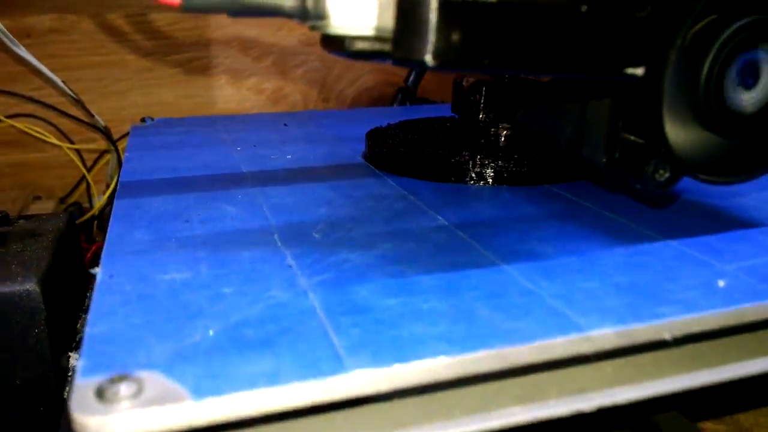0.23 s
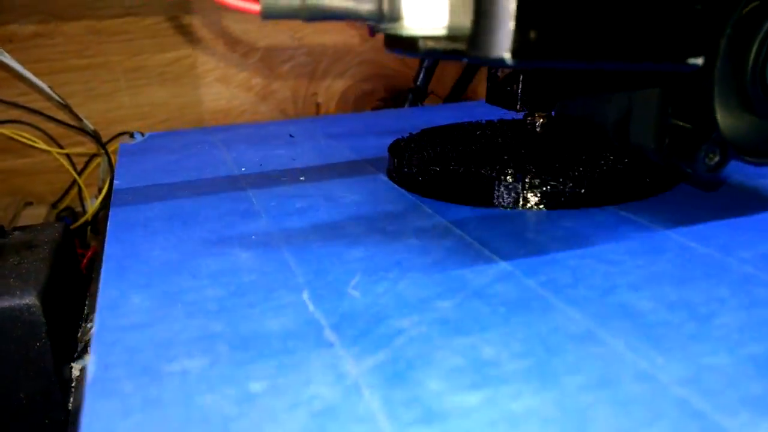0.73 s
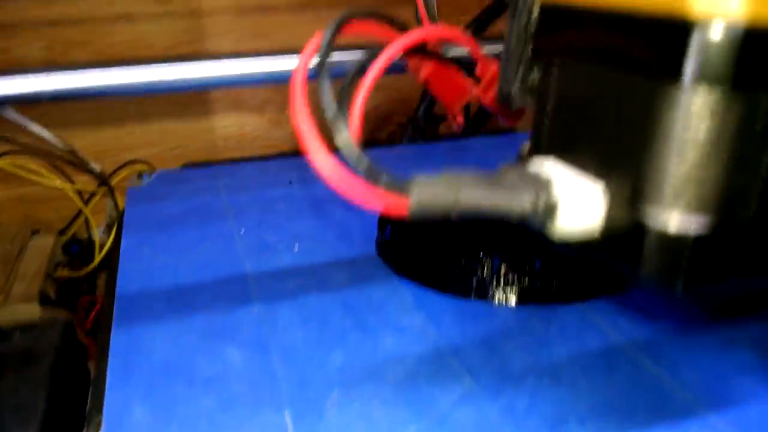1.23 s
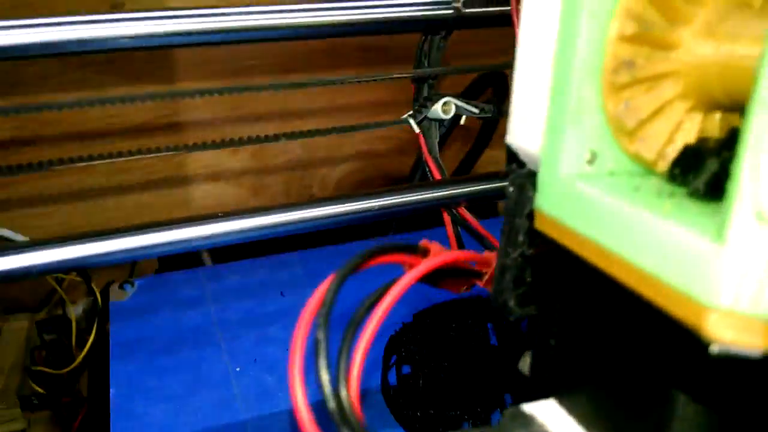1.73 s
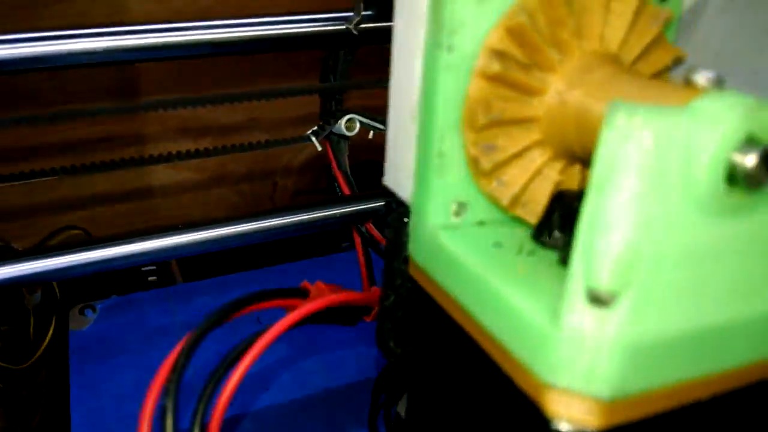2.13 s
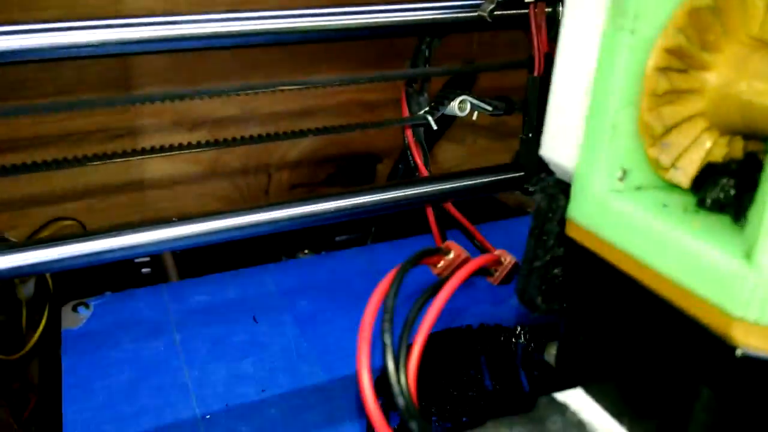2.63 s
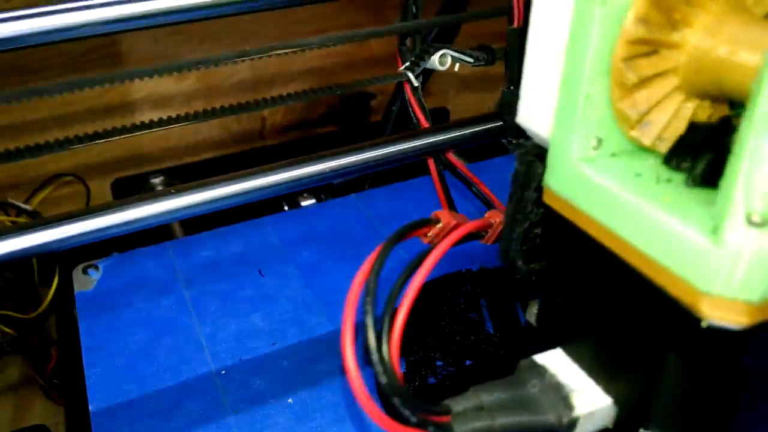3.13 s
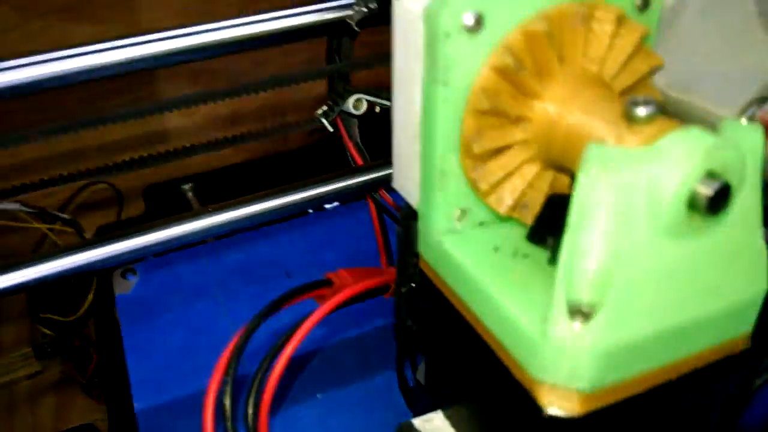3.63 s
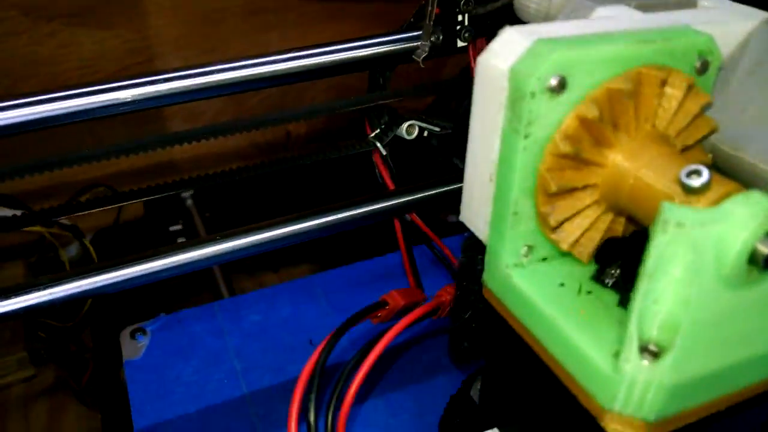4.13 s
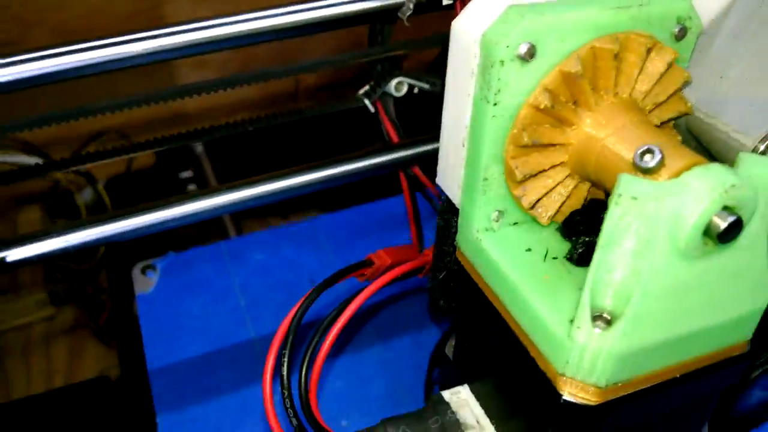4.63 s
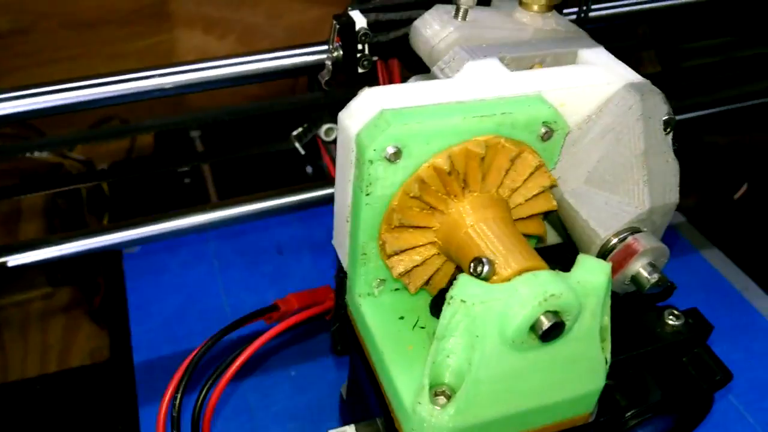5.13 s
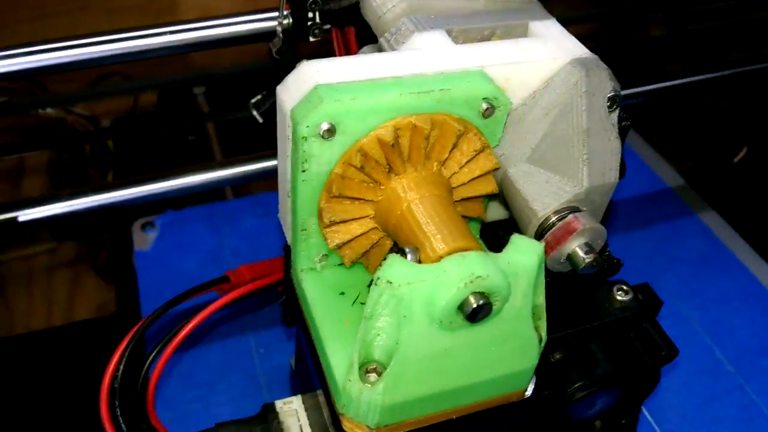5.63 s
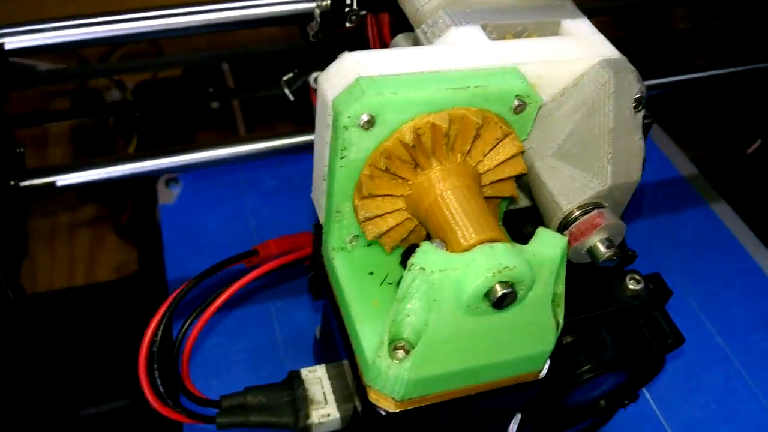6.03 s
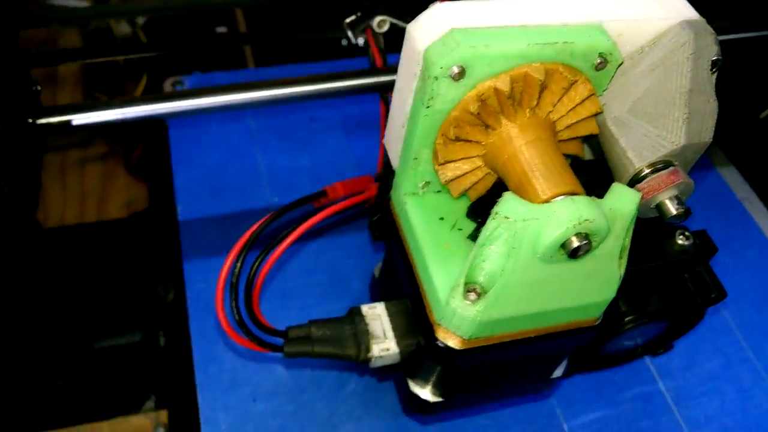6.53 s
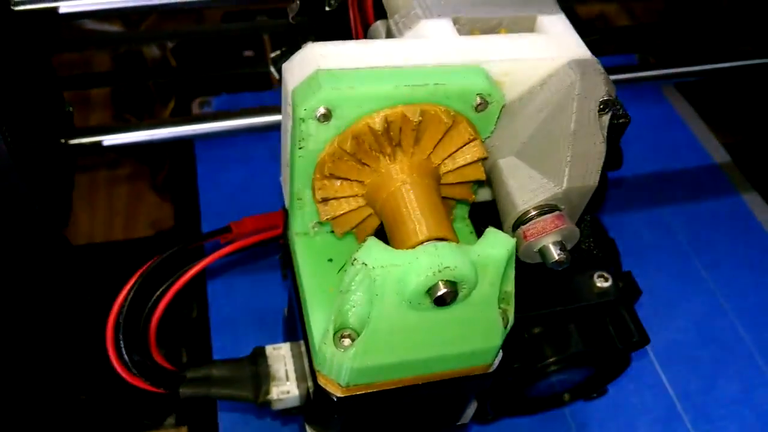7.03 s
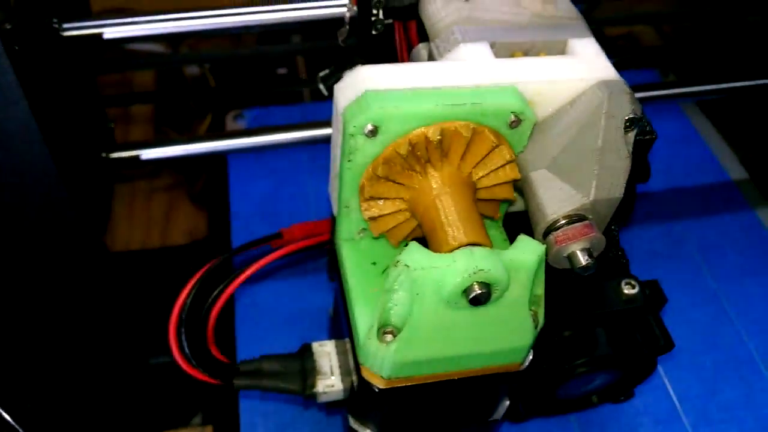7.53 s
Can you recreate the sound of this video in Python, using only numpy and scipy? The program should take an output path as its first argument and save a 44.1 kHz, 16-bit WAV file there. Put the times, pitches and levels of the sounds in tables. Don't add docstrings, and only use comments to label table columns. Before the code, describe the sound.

A desktop 3D printer's stepper motors whine in quick rising, held and sinking tones over fan hiss, with soft corner knocks and one hard microphone tap.

```python
import sys
import numpy as np
from scipy import signal
from scipy.fft import rfft, irfft
from scipy.io import wavfile
from scipy.ndimage import uniform_filter1d

SR = 44100
rng = np.random.default_rng(int(sys.argv[2]) if len(sys.argv) > 2 else 0)


def output_pcm(signal):
    pcm = np.clip(np.atleast_2d(signal).T, -1, 1) * 32767
    wavfile.write(sys.argv[1], SR, np.round(pcm).astype(np.int16))


def linear_from_db(decibels):
    return 10 ** (np.asarray(decibels, float) / 20)


N = 343098
TIME = np.arange(N) / SR
FREQ = np.arange(N // 2 + 1) * SR / N + 1e-3

# cruise microstep rates of (bed f/Hz, carriage f/Hz) at the one feed rate
FLAT, SLANT, STEEP = (5163.5, 2138.5), (4435.5, 3400.5), (729.6, 5544.)
ALONG, ACROSS, TALL = (5544., 729.6), (3400.5, 4435.5), (2138.5, 5163.5)
MICROSTEPS = 16
LAP_S = 4.337
# (t/s, heading, strength level/dB)
LAP = [(-.58, FLAT, 0), (-.077, TALL, 3.5), (-.002, FLAT, -0.5), (.049, TALL, 1.5), (.199, FLAT, -1.5),
       (0.283, TALL, -1), (.354, FLAT, -1), (.856, SLANT, 0.5), (1.373, ALONG, 1.5), (1.439, STEEP, -1),
       (1.499, ACROSS, 5.5), (1.646, STEEP, 1.5), (1.699, ALONG, -0.5), (1.765, SLANT, 0.5),
       (2.266, ALONG, -3), (2.299, STEEP, -1.5), (2.791, SLANT, -1.5), (2.891, ACROSS, -33),
       (2.946, ALONG, -1.5), (3.091, ACROSS, -7), (3.139, SLANT, 1.5), (3.239, STEEP, -0.5),
       (3.73, ACROSS, -9)]
# (f/Hz, level/dB per Hz)
FANS = [(30, -11), (60, -3), (120, 3), (250, -3.5), (500, -11.5), (900, -11.5), (1500, -12.5),
        (2500, -13.5), (4000, -18), (7500, -19.5), (11000, -17.5), (14000, -14), (15500, -18.5)]
# (f/Hz, width/Hz, level/dB)
CASE = [(120.1, 10, 3.5), (256.5, 36, 4), (483, 34, 14.5), (2050, 97, 6.5), (3230, 760, 3.5), (631, 18, 2),
        (1058, 25, 4.5), (6800, 980, 3.5)]
TAP_S = 6.2297


def steppers():
    # (multiple of the full-step rate, level/dB)
    bed_hum = [(1, 0), (2, -7), (3, -11.5), (4, -12), (5, -8), (6, -12), (7, -16), (8, -42), (10, -16.5),
               (14, -18), (15, -8), (17, -16.5)]
    bed_step = [(16, 0)]
    bed_over = [(31, -11), (32, 1.5), (33, -36), (48, -9.5), (48.5, -19), (64, -10), (96, -15.5),
                (144, -46), (160, -4.5)]
    carriage_step = [(1, -9), (3, -8.5), (4, -6.5), (6, -15), (15, -18), (16, 1), (17, -10)]
    carriage_over = [(31, -18), (32, 0), (33, -29)]
    tick_orders = [(2, -2), (2, -1), (2, 1), (2, 2), (4, -1), (2, -6), (2, -1 / 16)]
    tick_levels = [-7, -9, -20, -31, -29, -20, -12]
    # (f/Hz, width/Hz, level/dB)
    frame_modes = [(252.7, 86, 16), (503, 26, 16), (711, 8, 4), (1037, 370, 8), (2022, 74, 16),
                   (2540, 490, 10), (4452, 112, 14.5), (5260, 1250, 7), (6470, 160, 7.5), (8880, 190, 18),
                   (10200, 430, 5.5), (13930, 1700, 26)]
    voices = {FLAT: (-32, -36.5, -35.5, -37.5, -44.5), SLANT: (-29.5, -28, -34, -43.5, -50),
              STEEP: (-25, -33.5, -40, -38.5, -40), ALONG: (-34.5, -37.5, -36, -37.5, -52),
              ACROSS: (-29.5, -41, -53, -45, -29), TALL: (-30, -35, -35.5, -37, -33)}
    # (t/s, nearness, facing the bed step, the overtones, the carriage)
    drift = [(0, 0.5, -4.5, -7.5, -1.5), (.6, 0, 5, 2.5, 5.5), (.9, 3, -6, -15, -4.5),
             (1.1, 0, -2.5, 4, -8), (1.35, 1.5, -12, -10, -2.5), (1.85, 0, -13.5, -5.5, -0.5),
             (2.05, 1, -7.5, -12, -2.5), (2.25, -0.5, 3.5, 2.5, -1), (2.8, -1, 6, 1.5, 0.5),
             (3.5, -1.5, 3.5, 2, -3), (4, 1.5, -10, -1, -4), (4.8, 0.5, -1.5, -4.5, -3),
             (5.15, 2, -11, -6, -2), (5.4, -1.5, -7.5, 0.5, 0.5), (5.7, -2, -1.5, -3, 3.5),
             (6.35, 0, -5, -7, -2), (6.55, 1, 1, -2.5, -5.5), (7.78, 1, -1.5, -4, -2)]

    bed, carriage = np.transpose([heading for _, heading, _ in LAP])
    move, speed = motion()
    ramping = uniform_filter1d(1. * (speed < 1), size=300)
    step_blur, over_blur, carriage_blur = [linear_from_db(db * ramping) for db in (0, -9, -4)]
    speed = speed * (1 + .03 * (speed < 1) * walk(300))
    bed_hz, carriage_hz = speed * bed[move], speed * carriage[move]

    frame = peaks(frame_modes) ** 1.36 / (1 - 1j * 170 / FREQ) ** 2
    t, near, to_step, to_over, to_carriage = np.transpose(drift)
    aims = near, near + to_step, near + to_over, near + to_carriage, near + to_over
    heard = np.transpose([np.add(voices[heading], db) for _, heading, db in LAP])
    cruise = np.maximum(bed / MICROSTEPS, 250), bed, 2 * bed, carriage, 2 * carriage
    drives = []
    for aim, db, hz in zip(aims, heard, cruise):
        push = linear_from_db(db) / np.interp(hz, FREQ, abs(frame))
        drives.append(linear_from_db(np.interp(TIME, t, aim)) * uniform_filter1d(push[move], size=400))
    hum, step, over, slide, slide_over = drives

    bed_full, carriage_full = bed_hz / MICROSTEPS, carriage_hz / MICROSTEPS
    sound = hum * tones(bed_hum, bed_full)
    sound = sound + step_blur * step * tones(bed_step, bed_full)
    sound = sound + over_blur * over * tones(bed_over, bed_full)
    fast, slow = np.maximum(bed_hz, carriage_hz), np.minimum(bed_hz, carriage_hz)
    ticks = 0
    for (m, n), db in zip(tick_orders, tick_levels):
        ticks = ticks + tones([(1, db)], np.abs(m * fast + n * slow))
    sound = sound + carriage_blur * slide * (tones(carriage_step, carriage_full) + ticks)
    sound = sound + over_blur * slide_over * tones(carriage_over, carriage_full)
    return shape(sound, frame) * linear_from_db(0.64)


def motion():
    corner, ramp_per_s = .215, 15.2
    start = np.array([s + lap * LAP_S for lap in range(3) for s, _, _ in LAP])
    move = np.searchsorted(start, TIME, side="right") - 1
    from_corner = np.minimum(TIME - start[move], start[move + 1] - TIME)
    return move % len(LAP), np.minimum(1, corner + ramp_per_s * from_corner)


def tones(table, steps_hz):
    phase = 2 * np.pi * np.cumsum(steps_hz) / SR
    out = 0
    for k, db in table:
        level = np.sqrt(2) * linear_from_db(db + 1.2 * walk(9))
        out = out + level * np.sin(k * phase + k * k) * (k * steps_hz < SR / 2.5)
    return out


def jolts():
    # (t/s, peak level/dB, low mode level/dB)
    shoves = [(-.588, -46, -14), (-.081, -37, 5), (-.019, -30, 12), (.046, -18, -3), (.199, -16, -0.5),
              (.276, -14, -15), (.358, -17.5, 3), (.83, -22, -15), (.858, -25, 15), (1.349, -20, 6),
              (1.385, -34, 16), (1.44, -22, 6.5), (1.496, -19, 1.5), (1.647, -27.5, 6), (1.71, -36, -16),
              (1.76, -16, -0.5), (2.279, -31, 9), (2.329, -22, 9), (2.759, -15.5, -11), (2.812, -17, -1),
              (2.905, -24.5, -14), (2.95, -26, 6.5), (3.095, -16, 2), (3.138, -18, 4.5), (3.235, -26, 14),
              (3.278, -24, -9), (3.708, -23, 5.5)]
    # (f/Hz, t60/s)
    shove_modes = [(262, 0.11), (488, 0.1), (748, 0.096)]
    out, age = np.zeros(N + SR), np.arange(SR // 6) / SR
    rows = [(s + lap * LAP_S, db, low) for lap in range(2) for s, db, low in shoves]
    rows = [row for row in rows if 0 < row[0] < N / SR]
    for (s, db, low), chance in zip(rows, rng.random((len(rows), 3))):
        high = -14 + (0.5 - -14) / (1 + np.exp((s - 2.05) / .15))
        for (hz, t60), rel, u in zip(shove_modes, (low, 0, high), chance):
            swell = 1 - np.exp(-age / 0.0046)
            ring = linear_from_db(db + rel - 6.0 - 60 * age / t60) * swell * 2
            pitch = hz * (.97 + 0.024 * u)
            out[int(s * SR):][:len(age)] += ring * np.sin(2 * np.pi * (pitch * age + u))
    return out[:N]


def tap():
    # (f/Hz, level/dB, t60/s)
    shell = [(540, 1, .011), (720, -14, .05), (2600, -1, .0045), (8500, -4, .0025), (5500, -9, .002),
             (11500, -6, .002), (280, -13, .06)]
    out = np.zeros(N)
    for late, weak in ((0, 1), (.0046, -.2)):
        age = np.maximum(TIME - TAP_S - late, 0)
        for hz, db, t60 in shell:
            out = out + weak * linear_from_db(-3 + db - 60 * age / t60) * np.sin(2 * np.pi * hz * age)
    age = np.maximum(TIME - TAP_S - .001, 0)
    ring = linear_from_db(-12 - 60 * age / .11) * np.sin(2 * np.pi * 560 * age)
    dull = shape(np.roll(out, shift=14), 1 / (1 + 1j * FREQ / 4000))
    return np.array([out, ring - linear_from_db(-4) * dull])


def handling():
    # (t/s, length/s, level/dB, f/Hz)
    brushes = [
        (0.694, 0.049, -24.5, 1190),
        (.76, 0.028, -29.5, 1500),
        (4.996, 0.012, -29.5, 2217),
        (5.017, .04, -31, 1800),
    ]
    out = np.zeros(N)
    for s, length, db, hz in brushes:
        age = np.maximum(TIME - s, 0) / length
        envelope = (TIME > s) * np.exp(-age ** 3) * np.minimum(age * 8, 1)
        grains = rng.standard_normal(N) * linear_from_db(4.2 * walk(300)) * envelope
        band = 1 / (1 + 1j * (FREQ - hz * hz / FREQ) / (1.3 * hz))
        out = out + linear_from_db(db + 9) * shape(grains, band)
    return out


def gear():
    # (f/Hz, width/Hz, level/dB)
    housing = [(1045, 36, 34), (1142, 40, 34), (1417, 60, 30.5)]
    clicks = (rng.random(N) < 70 / SR) * linear_from_db(5.8 * rng.standard_normal(N))
    ring = shape(clicks, peaks(housing) - 1)
    faced_s, turned_s, aside_db = 3.9, 5.15, -11
    faced = np.clip(np.minimum(TIME - faced_s, turned_s - TIME) / 0.11, 0, 1)
    return ring / ring.std() * linear_from_db(-38.5 + aside_db * (1 - faced))


def rattle():
    # (t/s, length/s, middle level/dB, high level/dB)
    scrapes = [(0, .03, -17, 8), (0.317, 0.059, 8, -7), (.745, 0.035, 14, 2), (1.561, 0.11, 7, 2),
               (1.71, .06, 6.5, 0.5), (1.82, 0.017, -1, 12), (2.25, .04, 2, 1), (3.021, 0.025, 9, 11),
               (3.765, 0.044, 5.5, 5), (4.159, 0.081, 0, 4), (4.59, 0.073, 3, -1.5), (4.797, 0.1, 3, 3),
               (5.023, 0.064, 11, 0), (5.945, 0.028, 8, 8), (6.29, 0.044, 6, 8), (7.175, .04, -10, 6.5)]
    shake_db, wander_db = (0.5, 5, 1.5), (2, 1.9, 1.2)
    ramping = uniform_filter1d(1 - motion()[1], size=800)
    ramping = 2 * (ramping - ramping.mean())
    low, mid, high = [db * ramping + spread * walk(12) for db, spread in zip(shake_db, wander_db)]
    for s, length, mid_db, high_db in scrapes:
        bump = np.exp(-((TIME - s) / length) ** 2)
        mid, high = mid + mid_db * bump, high + high_db * bump
    return low, mid, high


def hiss():
    low, mid, high = rattle()
    noise = rfft(rng.standard_normal(N)) * linear_from_db(read(FANS)) * peaks(CASE)
    out, shiver = 0, walk(22)
    for hz in 30 * 2 ** np.arange(0, 9.4, .5):
        place = np.log2(hz / 1000)
        swell = low * np.clip(-place / 2, 0, 1)
        swell = swell + mid * np.clip(1 - abs(place) / 2.4, 0, 1)
        swell = 0.65 * (swell + high * np.clip(place / 3.0, 0, 1))
        band = np.cos(np.pi * np.clip(np.log2(FREQ / hz), -.5, .5)) ** 2
        flicker = 1.3 * walk(28) + .3 * max(place, 0) * shiver
        out = out + linear_from_db(swell + flicker) * irfft(noise * band, N)
    return out * linear_from_db(-26) / np.sqrt(np.mean(out ** 2))


def fan_tones():
    blade = tones([(1, -46.5)], 665 * (1 + .002 * walk(4)))
    whistle = tones([(1, -44)], 6706 * (1 + .0005 * walk(12)))
    return blade + whistle * np.clip((TIME - 6.58) / .1, 0, 1)


def port_noise():
    # (f/Hz, level/dB)
    apart = [(40, -9), (150, -6.5), (500, 2), (1200, -11.5), (3000, -21), (8000, -13.5), (15000, -17)]
    return shape(rng.standard_normal((2, N)), linear_from_db(read(FANS) + read(apart)) * peaks(CASE)) * linear_from_db(-11.5)


def left_port(right):
    # (f/Hz, phase/rad)
    bass_turn = [(40, 0.15), (60, 0.53), (100, 2.1), (200, 1.77), (300, 1.5), (500, 0.99), (850, 0.38),
                 (1300, 0.17), (2400, 0.18), (15000, 0.033)]
    # (f/Hz, level/dB)
    balance = [(40, -9), (80, -15), (200, -5.5), (500, 0.6), (1300, -0.26), (4000, -2.5), (9000, -3.5),
               (15000, -1.5)]
    lag_s = 17.2 / 44100
    return shape(right, -linear_from_db(read(balance)) * np.exp(-1j * (2 * np.pi * FREQ * lag_s + read(bass_turn))))


def read(table):
    hz, value = np.transpose(table)
    return np.interp(np.log(FREQ), np.log(hz), value)


def shape(x, response):
    return irfft(rfft(x) * response, N)


def peaks(modes):
    return 1 + sum((linear_from_db(db) - 1) / (1 + 1j * (FREQ - hz * hz / FREQ) / width) for hz, width, db in modes)


def walk(rate):
    k = int(SR / rate)
    held = np.repeat(rng.standard_normal(N // k + 1), k)
    return 1.3 * uniform_filter1d(uniform_filter1d(held, k), k)[:N]


def scene():
    right = steppers() + jolts() + handling() + gear() + hiss() + fan_tones()
    return np.array([left_port(right), right]) + tap() + port_noise()


def low_pass(x):
    return signal.sosfilt(signal.butter(12, 15870, fs=SR, output="sos"), x)


def record(dry):
    age = TIME - TAP_S - .0025
    duck_db, attack_s, release_s = -10.5, 0.0062, 0.36
    duck = linear_from_db(duck_db * np.clip(age / attack_s, 0, 1) * np.exp(-np.maximum(age, 0) / release_s))
    top = signal.ellip(8, .2, 60, 15520, fs=SR, output="sos")
    return low_pass(np.clip(signal.sosfilt(top, dry * duck), -1, 1))


dry = scene()
out = record(dry)
output_pcm(out)
```